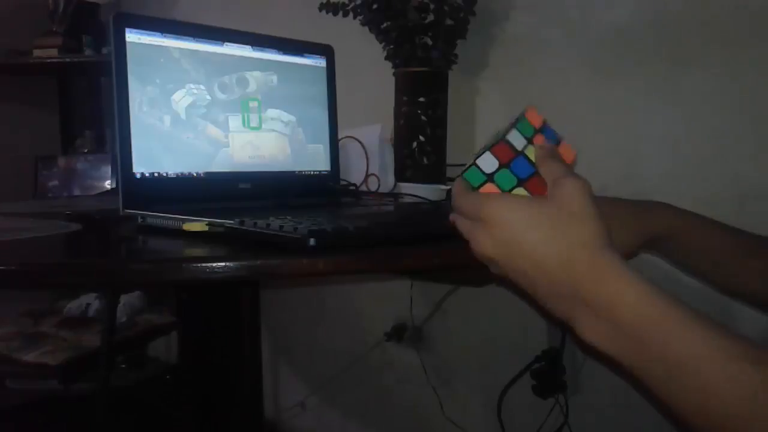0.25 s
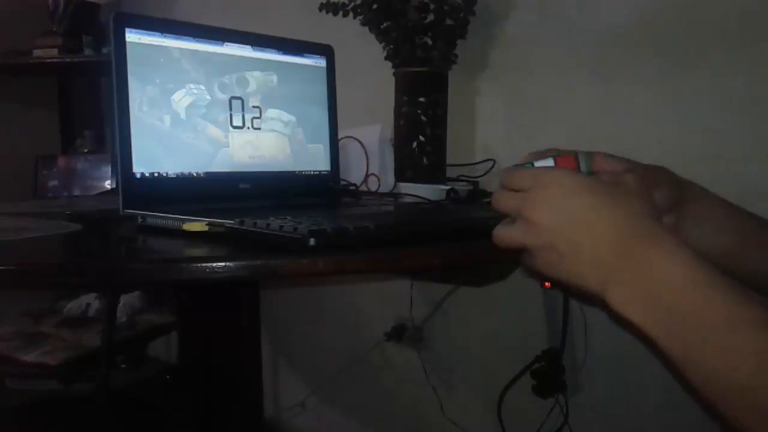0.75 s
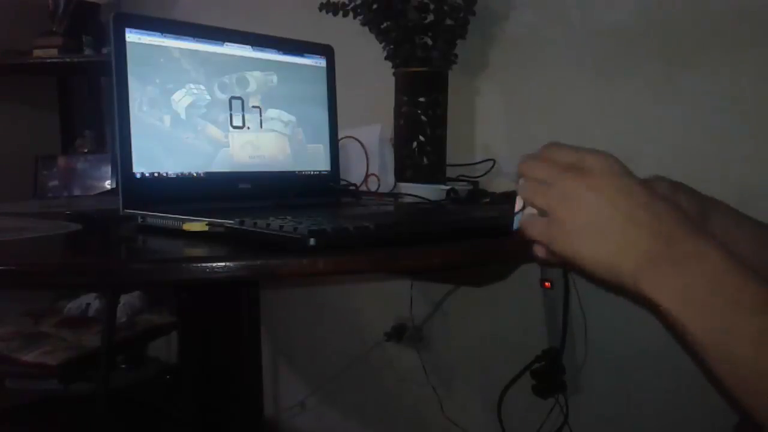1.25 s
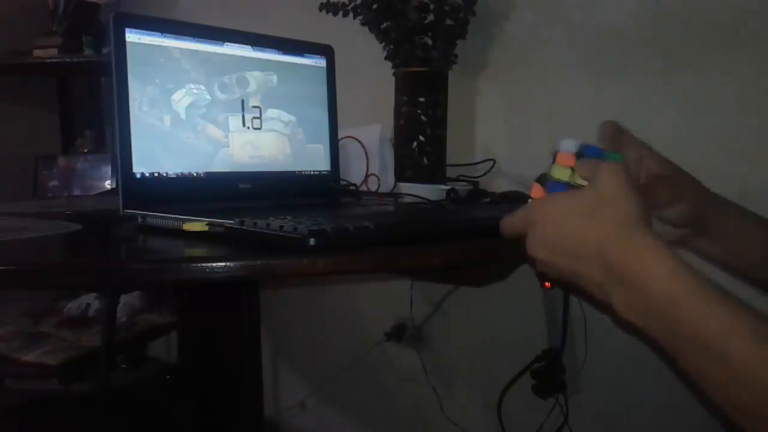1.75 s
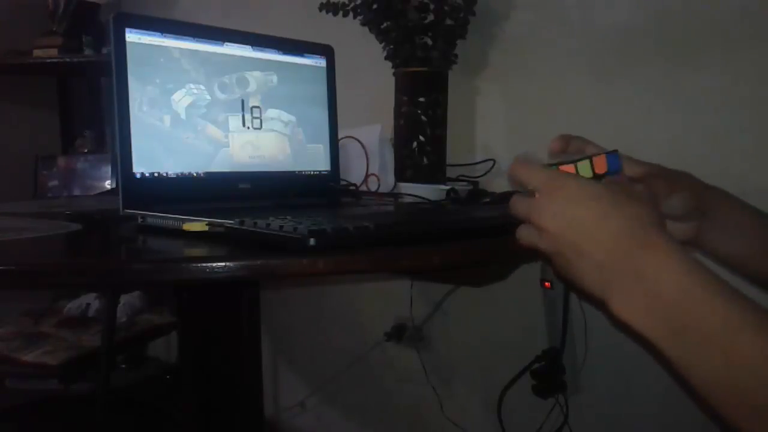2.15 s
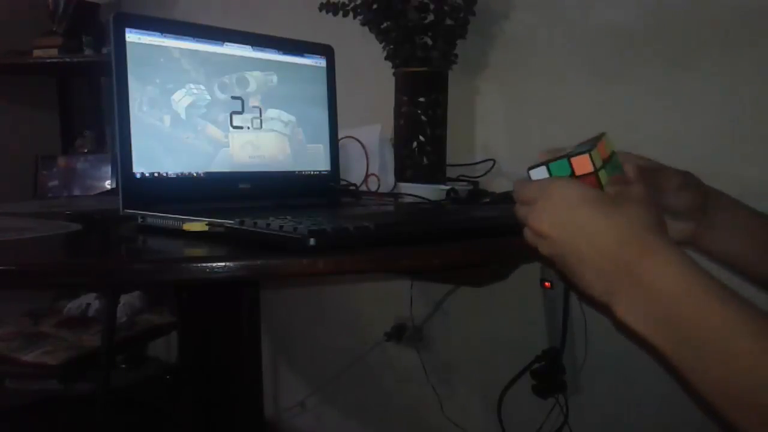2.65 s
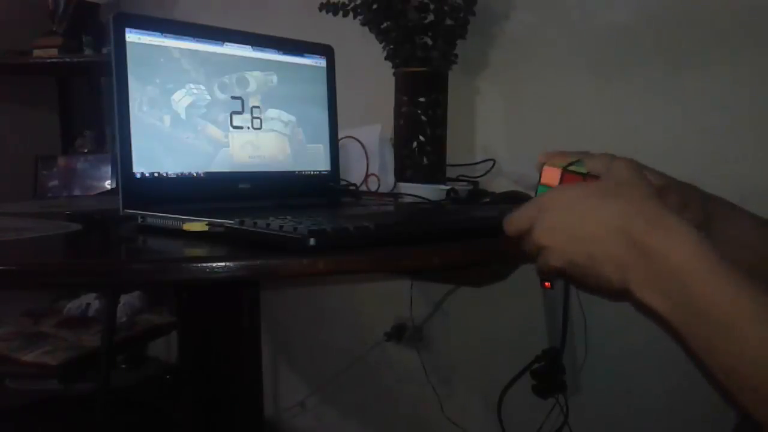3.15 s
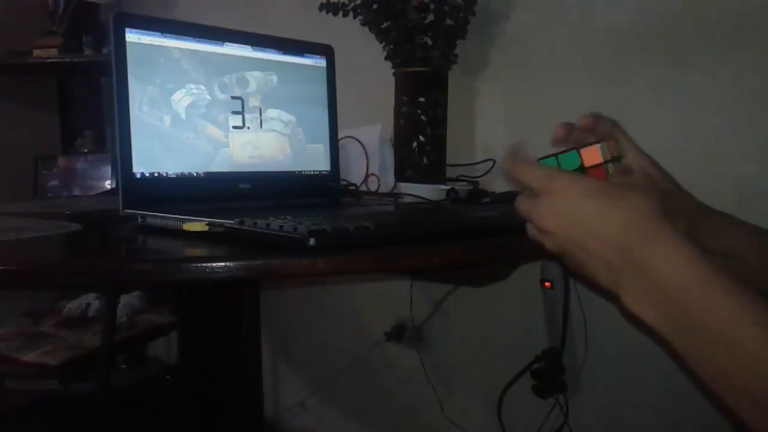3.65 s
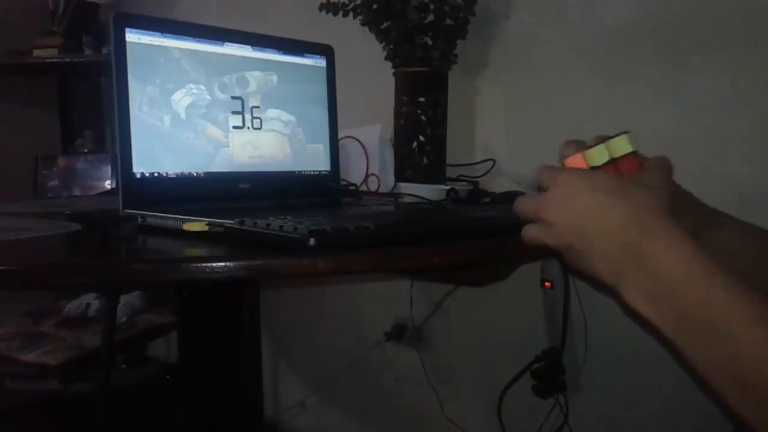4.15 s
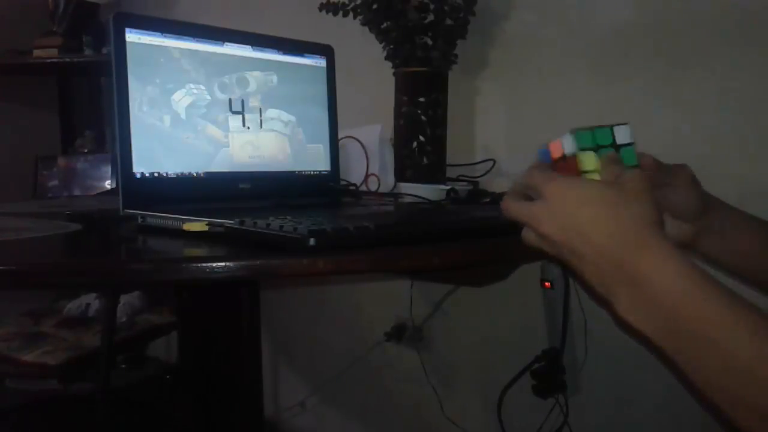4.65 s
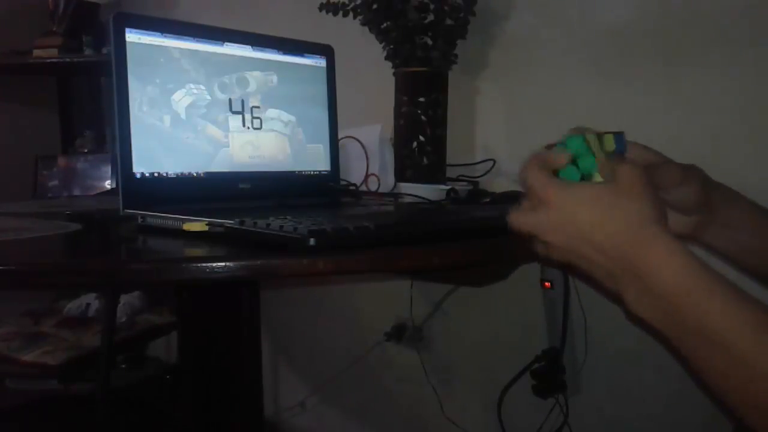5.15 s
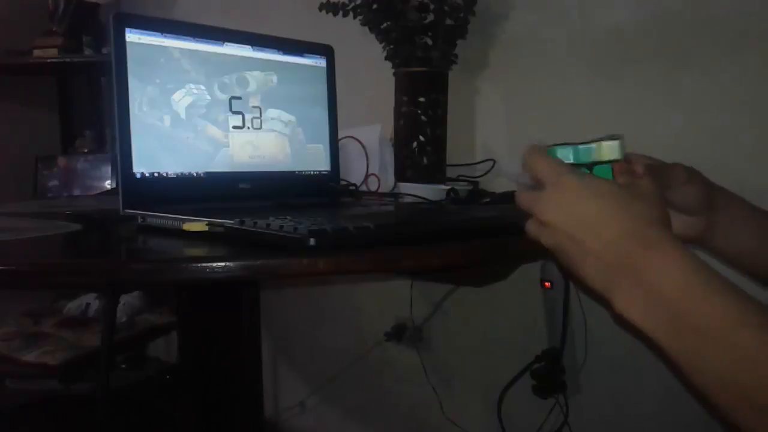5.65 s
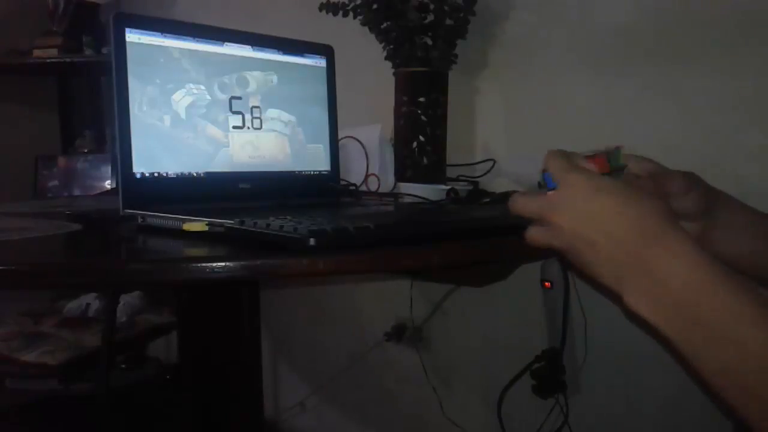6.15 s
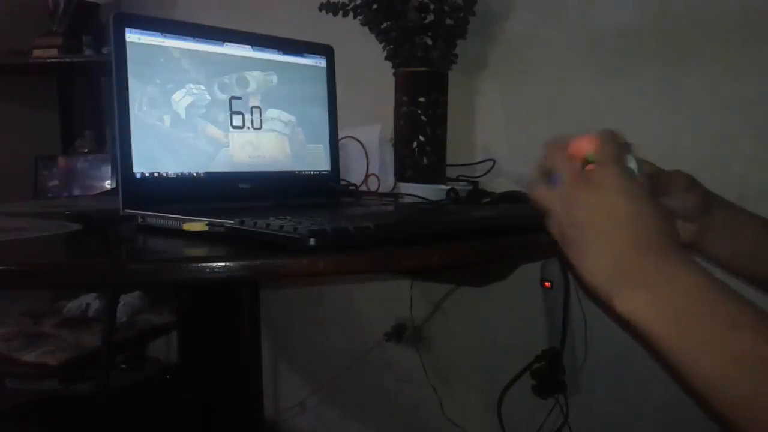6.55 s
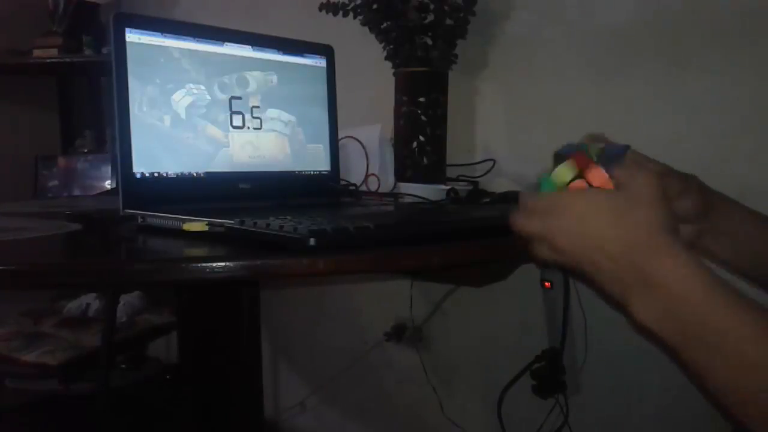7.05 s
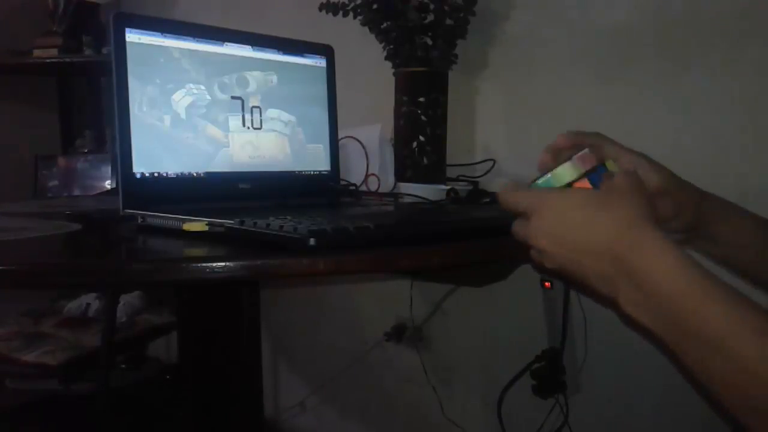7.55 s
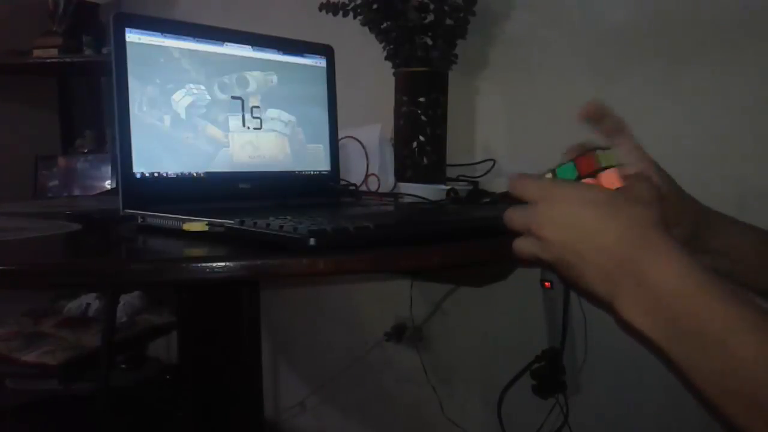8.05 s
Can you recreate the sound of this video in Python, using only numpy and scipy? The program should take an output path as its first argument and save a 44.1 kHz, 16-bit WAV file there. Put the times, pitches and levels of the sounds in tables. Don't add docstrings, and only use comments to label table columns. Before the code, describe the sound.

Two hands work a plastic puzzle cube: crisp clicks, chattering pieces and faint layer rubbing, following a soft key release near the start. Scattered turns grow into a thick rattling run, peak in one sharp clack, then thin out before a final flurry. A cheap close microphone with noise suppression catches short hard-walled reflections; thin whine, hum and hiss rise around the activity and nearly vanish in pauses.

```python
import sys
import numpy as np
from scipy import signal
from scipy.fft import rfft, irfft, next_fast_len
from scipy.io import wavfile

SR = 44100
rng = np.random.default_rng(int(sys.argv[2]) if len(sys.argv) > 2 else 0)


def decibels_to_gain(level_db):
    exponent = np.asarray(level_db, float) / 20
    return 10 ** exponent


def unload_audio(sound):
    columns = np.transpose(np.atleast_2d(sound))
    steps = np.round(np.clip(columns, -1, 1) * 32767)
    wavfile.write(sys.argv[1], SR, steps.astype(np.int16))


N = 366030

# (frequency [Hz], density [dB per Hz])
SHELL_COLOUR = [(240, -23.5), (400, -7.5), (490, -16), (620, -12.5), (742, -16.5), (1960, -6.5), (3470, -7),
                (4150, -2), (6240, 1), (8500, -5), (9470, -9), (13300, -17.5), (16000, -26.5)]
# (frequency [Hz], level [dB])
CORE_COLOUR = [(30, 19), (350, -68), (900, -13), (1350, -2), (1800, 26.5), (2800, -28), (4000, 9),
               (8000, -15)]


def unit(x):
    return x / np.sqrt(np.mean(x ** 2) + 1e-20)


def along(points, hz):
    f, value = np.transpose(points)
    return np.interp(np.log(hz + 1), np.log(f + 1), value)


def filtered(x, response):
    size = next_fast_len(N + SR // 2)
    return irfft(rfft(x, size) * response(np.fft.rfftfreq(size, 1 / SR)), size)[:N]


def causal(points, size=4096):
    colour = decibels_to_gain(along(points, np.fft.rfftfreq(size, 1 / SR)))
    cepstrum = irfft(np.log(colour + 1e-6))
    cepstrum[1:size // 2] *= 2
    cepstrum[size // 2 + 1:] = 0
    pulse = irfft(np.exp(rfft(cepstrum)))[:size // 2]
    return pulse / np.linalg.norm(pulse)


def through(x, pulse):
    return signal.fftconvolve(x, pulse)[:N]


def scatter(s, waves):
    at = np.round(s * SR).astype(int)[:, None] + np.arange(waves.shape[1])
    return np.bincount(at.ravel(), waves.ravel(), N + SR)[:N]


def level_db(x, smooth):
    return 10 * np.log10(np.abs(filtered(x ** 2, smooth)) + 1e-12)


def background():
    # (multiple [of mains], level [dB re third multiple])
    multiples = [(1, -16), (2, -20), (3, 0), (4, -14), (5, -6), (6, -6), (7, -25), (8, -18), (9, -19),
                 (10, -26), (11, -26), (13, -17), (14, -20), (15, -26), (17, -30), (19, -32), (21, -32)]
    # (frequency [Hz], level [dB re third multiple])
    whine_hz, whine_db = (7383, -24)
    # (frequency [Hz], density [dB per Hz])
    hiss_colour = [(590, -30), (1000, -10), (1370, -15), (2390, -12.5), (3150, -16.5), (6400, -14.5),
                   (7350, -10), (7980, -15.5), (13400, -19), (16000, -12)]
    # (frequency [Hz], level [dB re hiss at 1 kHz])
    rumble_colour = [(25, -1), (60, -3), (90, 2), (150, 5), (400, 6.5), (700, -1), (1000, 0)]
    mains_hz, slip = 59.16, 0.83
    t = np.arange(N) / SR
    turn = 2 * np.pi * mains_hz * t
    hum = np.zeros(N)
    for k, db in multiples:
        lag = 1.3 * (k > 6) + 2.4 * (k < 2) + slip * k * (t - 0.2) * (k < 3)
        hum += decibels_to_gain(db) * np.cos(k * (turn + 1.57) - lag)
    beat = decibels_to_gain(-11) * np.cos(6 * turn + 1.57 * 6 + np.pi + 2 * np.pi * 0.8 * (t - 1.1))
    whine = decibels_to_gain(whine_db) * np.sin(2 * np.pi * whine_hz * t)

    def colour(f):
        low_db = along(rumble_colour, f) + along(hiss_colour, 1100)
        air = decibels_to_gain(np.where(f < 1000, low_db, along(hiss_colour, f)))
        return air / (1 + (f / 14100) ** 100)

    hiss = decibels_to_gain(-4.5) * unit(filtered(rng.standard_normal(N), colour))
    return np.sqrt(2) * (hum + beat + whine) + hiss


def suppressor(loud):
    shut_db, threshold_db, opens = -65.5, -60.5, 0.31
    first_lag_s, second_lag_s = 0.039, 0.02
    heard_db = level_db(
        loud, lambda f: 1 / (1 + 2j * np.pi * f * first_lag_s) / (1 + 2j * np.pi * f * second_lag_s))
    return shut_db + opens * 10 * np.log10(1 + decibels_to_gain(2 * (heard_db - threshold_db)))


def snap_rows():
    # (time [s], peak [dB], ring [Hz],
    # chatter [dB])
    turn_snaps = [(0.52, -27.5, 6900, 8.5), (0.746, -42, 5000, 1.5), (0.865, -41, 6200, 2),
                  (0.882, -35, 5800, 7), (0.902, -33, 4780, 0), (0.984, -31, 6660, 2),
                  (1.0025, -34.5, 6460, 2), (1.1326, -27, 6540, 4.5), (1.141, -42, 7070, -1),
                  (1.1526, -24, 6590, 0), (1.173, -26, 5300, -4), (1.191, -29, 6300, -0.5),
                  (1.226, -27.5, 4830, 2.5), (1.386, -42.5, 5500, 1), (1.555, -48.5, 7700, 5),
                  (1.616, -32.5, 5000, 4), (1.6295, -35, 6900, -4), (1.745, -36.5, 8250, 7.5),
                  (1.7744, -48, 5800, 6), (1.784, -23, 5170, -1.5), (1.83, -28, 6900, 1.5),
                  (1.85, -20.5, 5130, 4.5), (1.94, -26.5, 5300, -4), (1.993, -30.5, 6640, -6),
                  (2.051, -57, 6210, -2), (2.171, -28, 5300, 8), (2.184, -24.5, 5200, -14),
                  (2.2415, -31.5, 5140, -7), (2.2472, -24, 5100, -2), (2.283, -39, 5930, 8.5),
                  (2.43, -47, 6840, 7), (2.442, -29, 6500, 0), (2.453, -27, 6820, -10),
                   (2.464, -27, 5170, 2), (2.47, -14, 5640, 6), (2.4841, -17.5, 6000, -3),
                   (2.497, -16, 4900, 1), (2.545, -28, 6530, 1), (2.745, -46, 6200, -7),
                   (3.105, -46, 4060, -3), (3.114, -50, 4280, 0), (3.294, -42.5, 5170, -3),
                   (3.359, -38.5, 5400, 1.5), (3.385, -38.5, 6500, 11.5), (3.412, -36, 5850, 8),
                   (3.44, -27, 8150, 2.5), (3.4916, -29, 6100, 4.5), (3.5127, -18.5, 6350, 7),
                   (3.525, -17, 6460, -1), (3.5279, -13.5, 5900, -2), (3.632, -24.5, 6200, 4),
                   (3.665, -33, 8540, -1), (3.718, -22.5, 6650, -1), (3.796, -28, 6500, 1),
                   (3.8054, -26, 4260, -4), (3.826, -30, 6700, 4), (3.8361, -23, 5370, 4.5),
                   (3.868, -33, 8500, -6), (3.908, -24.5, 8170, 2), (3.935, -24, 6150, 3),
                  (3.9412, -24, 7060, 0), (3.9926, -24, 5170, 2), (4.023, -27, 6240, 8), (4.029, -24, 5870, 8),
               (4.035, -19, 5060, -13), (4.046, -18.5, 5260, 3), (4.072, -18, 7000, -4),
               (4.093, -32, 5000, 1), (4.112, -29, 5860, 4.5), (4.138, -24.5, 6240, 4),
               (4.1411, -18, 6160, -2), (4.16, -27, 5730, -3), (4.183, -24, 5760, -1),
               (4.192, -19.5, 6670, 4.5), (4.2037, -21.5, 4870, -5), (4.224, -15, 5160, 0.5),
               (4.333, -30, 6360, -2), (4.367, -29.5, 6950, -5), (4.409, -33, 5160, 2),
               (4.4462, -27, 7000, 2), (4.456, -27, 6440, 4.5), (4.468, -27.5, 6440, 3),
               (4.4912, -19, 4800, 2), (4.506, -14.5, 6050, -6), (4.537, -27, 6570, -3),
               (4.547, -19, 6240, 2.5), (4.5523, -19.5, 6500, -7), (4.566, -31, 6130, 2),
                  (4.696, -33.5, 6900, -2), (4.724, -39, 4890, 7), (4.74, -34, 6700, 0),
               (4.753, -29.5, 6360, 4), (4.7633, -23.5, 5270, 2.5), (4.802, -27.5, 5860, 2.5),
               (4.925, -17.5, 5220, 3.5), (4.9691, -35, 5360, 5), (5.002, -20, 5900, 5.5),
               (5.02, -18, 4730, -0.5), (5.069, -20.5, 6140, 5.5), (5.0975, -28.5, 5300, 5),
               (5.179, -23, 6650, 8.5), (5.2013, -22, 6370, -1), (5.209, -12, 5160, 5),
               (5.2293, -17, 5540, 3), (5.2422, -15, 7400, -6.5), (5.2456, -4, 6080, 4),
               (5.249, -16.5, 5500, -4.5), (5.561, -46.5, 6840, -17), (5.682, -39, 6730, -1.5),
               (5.7234, -64, 5910, 10), (5.771, -41, 7200, 8), (5.787, -31.5, 6730, 4.5),
               (5.7925, -21.5, 5470, 0.5), (5.819, -22.5, 6150, -5),
                  (6.023, -44, 4700, 0), (6.043, -40, 6440, -6), (6.0651, -30, 6500, 0),
                    (6.152, -43, 5750, 6.5), (6.18, -29, 7500, -1), (6.193, -28.5, 4860, -2),
                    (6.2021, -20, 6500, 2.5), (6.209, -19, 4870, 1), (6.242, -24, 5000, 3),
                    (6.2951, -25.5, 6000, -0.5), (6.423, -35, 5660, -6), (6.445, -40, 6200, -2),
                    (6.4531, -30.5, 8000, 3), (6.516, -36.5, 6400, -21), (6.559, -28, 7700, 6.5),
                    (6.567, -31, 4700, -2), (6.5824, -21.5, 4700, 4), (6.594, -22.5, 5250, 2),
                    (6.826, -39.5, 5150, -2.5), (6.838, -40, 8500, -9), (6.873, -39, 5840, 5),
                    (6.883, -36, 5500, 4.5), (6.897, -25.5, 4800, 2), (6.9026, -30, 4300, 0),
                    (6.987, -31.5, 6200, 6.5), (7.022, -30.5, 7160, 3), (7.0462, -24.5, 6750, 5),
                    (7.0554, -16.5, 5870, -2.5), (7.091, -23, 6300, -1.5), (7.101, -15.5, 5820, 6.5),
                  (7.263, -34.5, 6500, -13), (7.293, -36.5, 7550, -16), (7.6426, -40.5, 6400, -9),
                  (7.652, -35, 5350, 1.5), (7.668, -38.5, 5040, -2), (7.751, -41.5, 6500, 1),
                  (7.7844, -37, 7260, -2), (7.891, -32.5, 6860, 1.5), (7.924, -35, 5530, 0),
                  (7.941, -23, 4830, -4), (7.9707, -28, 6700, 5), (7.9764, -22, 6270, 4.5),
                  (7.9864, -24, 6040, -1), (8.011, -23.5, 7350, 4.5), (8.063, -24.5, 5360, 1),
                  (8.088, -23, 5900, 6.5), (8.097, -19.5, 5450, 3.5), (8.1059, -17.5, 5740, -4),
                  (8.115, -19.5, 5100, -14), (8.136, -19.5, 4860, 1.5), (8.1613, -21.5, 6200, 2.5),
                  (8.1785, -21.5, 4930, -3), (8.2138, -35, 5050, 4), (8.258, -32, 4640, -5),
                  (8.2684, -40, 4890, -9), (8.283, -18.5, 4860, -2), (8.2955, -23, 6470, 2)]
    rows = turn_snaps
    s, peak_db, hz, scrape_db = np.transpose(sorted(rows))
    land_s = 0.0006
    sharp_loses = 0.28
    return np.array([s + land_s, peak_db - 3, hz, scrape_db - sharp_loses * (peak_db + 31)])


def snaps(count=5, size=260):
    chatter_share, chatter_db = 0.25, -5.5
    scrape_softens = 0.95
    knock_db, crack_varies_db = -41, 1.5
    s, db, hz, after_db = snap_rows()[..., None]
    delay, weaker, detune, phase = np.moveaxis(rng.random((len(s), count, 4)), 2, 0)
    delay[:, 0], weaker[:, 0] = 0, 0
    chatters = delay > 0
    times = (s + 0.008 * delay).ravel()
    blow_db = db - 1.7 * delay - 2.1 * weaker
    blow_db = blow_db + (chatter_share * after_db + chatter_db) * chatters
    blow_db = blow_db - scrape_softens * np.clip(after_db, 0, None) * ~chatters
    blow = decibels_to_gain(blow_db).reshape(-1, 1)

    ring_hz = (hz * (1 + 0.19 * (detune - 0.5) * chatters)).reshape(-1, 1)
    late = np.arange(2 * size) / SR
    ring = np.sin(2 * np.pi * (ring_hz * late + phase.reshape(-1, 1)))
    ring = ring * decibels_to_gain(-60 * late / 0.0069) * (1 - np.exp(-late / 0.0002))
    rings = decibels_to_gain(-1.0) * scatter(times, blow * ring)

    t = np.arange(size) / SR
    burst = rng.standard_normal((len(times), size))
    burst = burst * decibels_to_gain(-60 * t / 0.0067) * (1 - np.exp(-t / 0.0004))
    shell, core = causal(SHELL_COLOUR), decibels_to_gain(knock_db) * causal(CORE_COLOUR)
    lean = np.repeat(decibels_to_gain(crack_varies_db * rng.standard_normal(len(s))), count)[:, None]
    crack = through(scatter(times, lean * blow * burst), shell)
    knock = through(scatter(times, blow * burst), core)

    push = scatter(s.ravel(), decibels_to_gain(db + 14.5))
    smooth = through(push, shell) + through(push, core)
    return rings + decibels_to_gain(-0.5) * crack + decibels_to_gain(16.5) * knock, 0.64 * rings + smooth


def key_release(size=500):
    # (time [s], level [dB])
    bumps = [
        (0.521, -23.5),
        (.55, -27.5),
        (0.588, -31.5),
    ]
    # (frequency [Hz], width [Hz], level [dB])
    desk = [(223, 34, 3), (342, 58, -3), (640, 46, -6), (3940, 160, -2), (6500, 1360, -1.5)]
    s, db = np.transpose(bumps)
    fade = np.linspace(1, 0, size) ** 2
    push = scatter(s, decibels_to_gain(db)[:, None] * rng.standard_normal((len(s), size)) * fade)

    def resonances(f):
        total = 0
        for k, (centre, width, gain_db) in enumerate(desk):
            mode = 1j * f * width / (centre * centre - f * f + 1j * f * width)
            total = total + (-1) ** k * decibels_to_gain(gain_db) * mode
        return total

    return filtered(push, resonances)


def contacts(rows, cycles, size=600):
    s, db, hz = np.transpose(rows)[..., None]
    turn = np.arange(size) / SR * hz
    swell = turn / cycles * np.exp(1 - turn / cycles)
    modes = np.sin(2 * np.pi * turn) + decibels_to_gain(-16.5) * np.sin(2 * np.pi * 2.2 * turn)
    return scatter((s - cycles / hz).ravel(), decibels_to_gain(db - 1.5) * swell * modes)


def dull_blows():
    # (time [s], peak [dB], ring [Hz])
    thuds = [
        (0.526, -47.5, 640),
        (0.5253, -52, 1080),
        (0.586, -48, 2550),
        (4.05, -49, 584),
        (4.926, -40, 1195),
        (6.585, -52, 600),
        (8.11, -46, 610),
    ]
    # (time [s], peak [dB], ring [Hz])
    clacks = [(0.8657, -56, 1820), (0.9926, -51.0, 2230), (1.1539, -37, 2270), (1.6317, -48, 2040),
              (1.786, -36, 2440), (1.7964, -40, 1930), (1.9948, -50, 1760), (2.199, -52, 1830),
              (2.4713, -32, 2510), (2.5074, -30, 1980), (3.2945, -56, 1760), (3.3611, -41.5, 2020),
              (3.6061, -45, 1810), (3.7198, -44, 1870), (3.7351, -44, 2220), (3.7971, -45, 1990),
              (3.8422, -46, 1740), (3.8497, -37, 2560), (3.9284, -40, 1890), (3.9426, -33, 1900),
              (3.994, -44, 1760), (4.0321, -56, 1890), (4.059, -38, 2470), (4.1592, -35, 2020),
              (4.2029, -34, 2020), (4.4102, -50, 1840), (5.0192, -43, 1860), (5.7878, -36, 1940),
              (6.0241, -51, 1800), (6.0676, -46, 1840), (6.594, -35.5, 2190), (6.9023, -41, 2130),
              (6.9841, -43, 2000), (7.0659, -38, 1920), (7.2132, -51, 2050), (7.6716, -48, 1770),
              (7.9256, -47, 1980), (7.9698, -41, 2110), (7.9977, -42, 1920), (8.1745, -34, 2270),
              (8.1872, -40, 1700)]
    return contacts(clacks + thuds, 1.2)


def edge_ticks():
    # (time [s], peak [dB], ring [Hz])
    early = [(0.5362, -35, 6300), (0.5754, -40, 6910), (0.5849, -34, 6400), (0.9022, -39, 6180),
             (0.9886, -47, 6800), (0.9954, -33, 4970), (1.1917, -43, 8000), (1.3961, -49.5, 6310),
             (1.7886, -34, 6250), (1.8311, -38, 6610), (1.8606, -30, 6950), (1.9944, -42, 6600),
             (1.9967, -30.5, 5960), (2.0519, -38, 6500), (2.1822, -41, 6010), (2.1838, -33, 5200),
             (2.1867, -29.5, 5190), (2.2513, -30, 6590), (2.4659, -34, 5360), (2.4823, -29, 5000),
             (2.4964, -26, 5450), (2.519, -29, 5000), (2.8564, -51, 6130), (3.1635, -54.0, 7470),
             (3.5265, -22, 6200), (3.5376, -24, 6460), (3.5619, -35, 6160), (3.666, -35, 8500),
             (3.7264, -33.5, 5840), (3.7932, -30, 5640), (3.7959, -29, 6560), (3.8269, -34, 7500),
             (3.9341, -31, 6500), (4.0398, -32, 6700), (4.0483, -20, 6200), (4.0562, -31, 4910),
             (4.1379, -22, 4700), (4.1463, -23, 5130), (4.1836, -20, 6000), (4.1936, -24, 6810),
             (4.2208, -24, 5870), (4.2381, -23, 5100), (4.369, -35, 6500), (4.5017, -27, 5730),
             (4.5039, -27, 6500), (4.5091, -21, 6460), (4.5117, -28, 5960), (4.5354, -28.5, 5730),
             (4.5523, -23, 6700), (4.5606, -33, 5580), (4.5673, -20, 6000), (4.6082, -28, 5940)]
    # (time [s], peak [dB], ring [Hz])
    late = [(4.768, -21, 6660), (4.775, -24.5, 8720), (4.805, -25, 6100), (4.9275, -20, 5400),
            (4.9375, -26, 5370), (5.0064, -23, 6200), (5.0142, -34, 5040), (5.0225, -33, 4930),
            (5.074, -22, 5230), (5.078, -26, 5100), (5.1187, -26, 5000), (5.1847, -32, 5100),
            (5.202, -21, 7000), (5.204, -16, 6300), (5.211, -27, 5230), (5.2432, -18, 6500),
            (5.2987, -20, 6950), (5.3022, -28, 5530), (5.7235, -50, 5840), (5.8173, -27, 8000),
            (6.1519, -39.0, 5400), (6.203, -28, 6400), (6.206, -23, 5400), (6.2968, -31, 5940),
            (6.3056, -34, 5840), (6.4273, -36, 5630), (6.4563, -53, 7280), (6.5679, -37, 5340),
            (6.5806, -31.0, 5840), (6.5856, -28, 4730), (6.5896, -39, 5150), (6.5933, -36, 5650),
            (6.596, -27, 5040), (6.8404, -43, 8440), (6.9077, -30, 4890), (7.0658, -21, 7100),
            (7.094, -20, 5570), (7.139, -23, 6500), (7.144, -23.5, 5360), (7.4643, -52.5, 7170),
            (7.5667, -55, 6090), (7.7811, -42, 5080), (7.7864, -36, 7300), (7.8971, -46, 5510),
            (7.969, -30, 5710), (7.973, -33, 6720), (7.9815, -32, 6910), (8.1139, -23, 4350),
            (8.1155, -22.0, 5320), (8.1368, -23, 6600), (8.173, -23, 4800), (8.1876, -26, 5490),
            (8.2964, -23.5, 6980)]
    # (time [s], peak [dB], ring [Hz])
    more_ticks = [
        (4.925, -36, 4650),
        (4.9257, -19.5, 5300),
        (4.9261, -15, 5500),
        (5.2297, -9, 5600),
        (5.2467, -9, 5780),
        (5.2485, -18, 6800),
        (5.2505, -7, 8000),
        (3.5262, -18, 6140),
        (3.5303, -16.5, 6700),
    ]
    # (time [s], peak [dB], ring [Hz])
    seatings = [
        (0.7485, -41.5, 4980),
        (3.107, -57, 4040),
        (3.5145, -31, 6240),
        (3.5192, -27, 6150),
        (4.9346, -25.5, 5200),
        (4.971, -30.5, 5540),
    ]
    # (time [s], peak [dB], ring [Hz])
    spikes = [
        (1.226, -30, 4940),
        (2.248, -21, 4900),
        (4.1422, -15, 4900),
        (4.159, -18, 6500),
        (4.4918, -15, 6340),
        (4.5474, -20, 6500),
        (5.246, -9, 6500),
        (7.1012, -9, 6500),
        (8.1064, -16, 5800),
        (8.1362, -16, 7000),
    ]
    return contacts(early + late + more_ticks, 1.6) + contacts(seatings, 4.2) + contacts(spikes, 0.8)


def rubbing(count=6000, size=60):
    where, weaker = rng.random((count, 2)).T
    slip = rng.standard_normal((count, size)) * decibels_to_gain(-60 * np.arange(size) / SR / 0.0026)
    slips = unit(scatter(where * N / SR, decibels_to_gain(-32 * weaker)[:, None] * slip))
    grain = slips + 0.3 * rng.standard_normal(N)
    return unit(through(grain, causal(SHELL_COLOUR) + decibels_to_gain(-14) * causal(CORE_COLOUR)))


def effort(clicks):
    # (middle [s], half length [s], level [dB])
    scrapes = [
        (3.404, .06, -56.5),
        (3.877, .05, -57),
        (4.097, .04, -55),
        (5.764, .03, -62),
        (6.17, .025, -60),
        (6.553, .012, -60),
    ]
    rest_db, rub_db, grows = -83, -11.5, 0.71
    lead_s, spread_s = 0.006, 0.014
    near_db = level_db(
        clicks, lambda f: 1 / (1 + 2j * np.pi * f * spread_s) / (1 - 2j * np.pi * f * lead_s))
    t = np.arange(N) / SR
    slides = sum(decibels_to_gain(db) * np.exp(-((t - s) / half) ** 2) for s, half, db in scrapes)
    return np.hypot(decibels_to_gain(rest_db) + slides, decibels_to_gain(rub_db - 46 + grows * (near_db + 41.5)))


def facing():
    s, _, _, after_db = snap_rows()
    latest = np.searchsorted(s, np.arange(N) / SR) - 1
    return decibels_to_gain(after_db[np.clip(latest, 0, None)])


def room(x, size=8192):
    # (frequency [Hz], t60 [s])
    decay = [(200, 0.48), (1500, 0.46), (5000, 0.51), (9000, 0.39), (15000, 0.37)]
    wet = np.zeros(N + SR)
    for start in range(0, N, size):
        hz, t, z = signal.stft(rng.standard_normal(SR * 3 // 4), SR, nperseg=256)
        fade = decibels_to_gain(-60 * t / along(decay, hz)[:, None])
        tail = signal.istft(z * fade, SR, nperseg=256)[1]
        tail *= 1 - np.exp(-np.arange(len(tail)) / SR / 0.0006)
        part = signal.fftconvolve(x[start:start + size], tail / np.linalg.norm(tail))
        wet[start:start + len(part)] += part[:len(wet) - start]
    return wet[:N]


def scene():
    clicks, spread = snaps()
    released = key_release()
    dull, bright = dull_blows(), edge_ticks()
    clicks = clicks + bright + dull
    spread = spread + decibels_to_gain(-4) * bright + decibels_to_gain(1) * dull
    soft = effort(clicks) * rubbing() + released
    wet = room(facing() * spread + soft)
    gate_db = suppressor(clicks + soft + wet)
    tail = decibels_to_gain(0.64 * (gate_db + 55.5)) * wet
    return (clicks + soft + tail + decibels_to_gain(gate_db) * background())[None]


def top_cut(x):
    return signal.sosfilt(signal.butter(12, 16690, fs=SR, output="sos"), x)


def record(dry):
    bent = np.abs(dry[0]) ** 2.7
    thump = filtered(bent, lambda f: 1j * f / (60 + 1j * f) / (1 + 1j * f / 120) ** 2)
    top_hz, offset = 15900, -0.0003
    band = filtered(dry[0] - 1.4 * thump, lambda f: 1 / (1 + (f / top_hz) ** 240))
    mix = band[None] + offset
    return top_cut(mix)


dry = scene()
out = record(dry)
unload_audio(out)
```